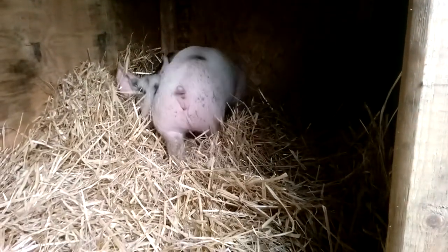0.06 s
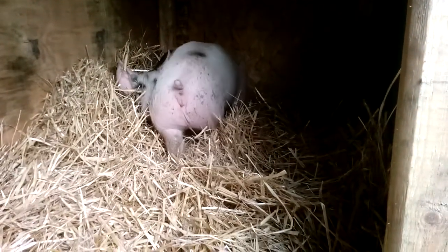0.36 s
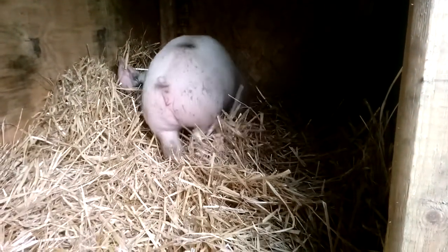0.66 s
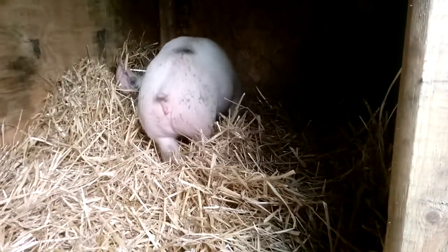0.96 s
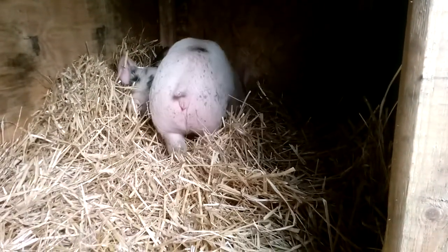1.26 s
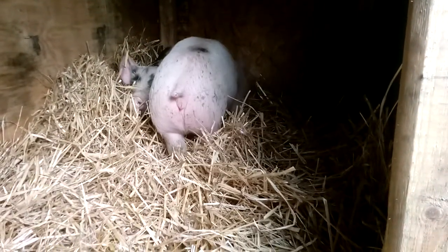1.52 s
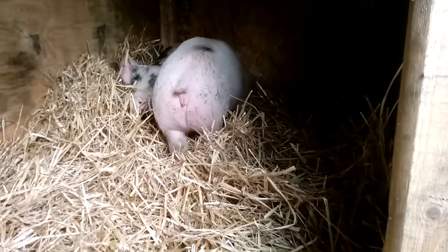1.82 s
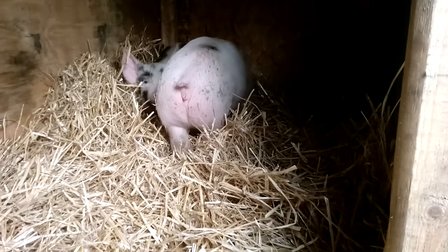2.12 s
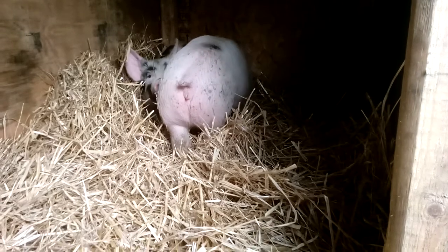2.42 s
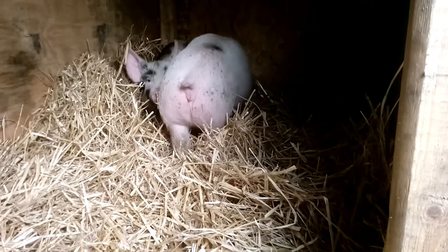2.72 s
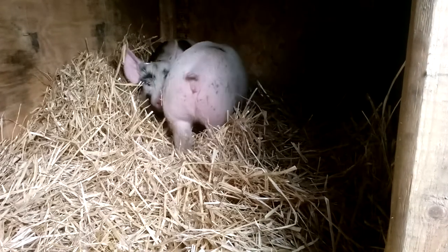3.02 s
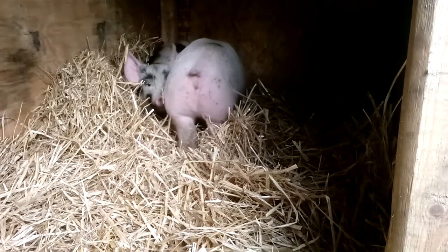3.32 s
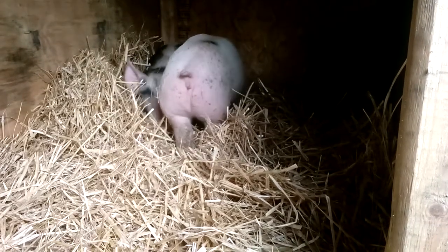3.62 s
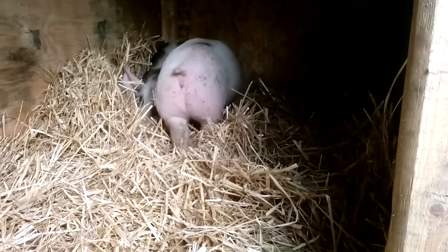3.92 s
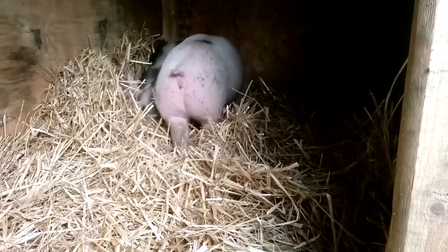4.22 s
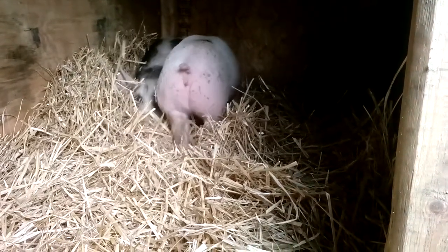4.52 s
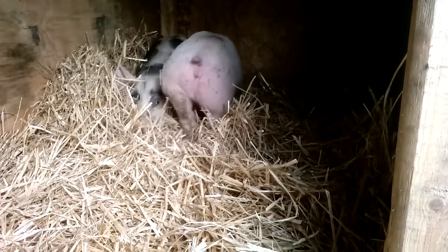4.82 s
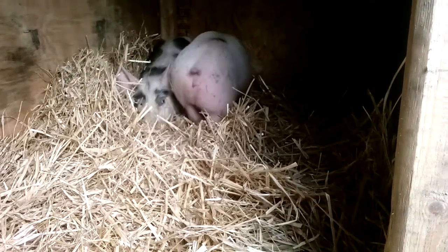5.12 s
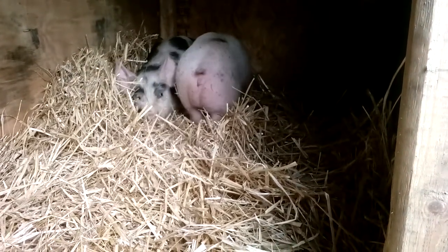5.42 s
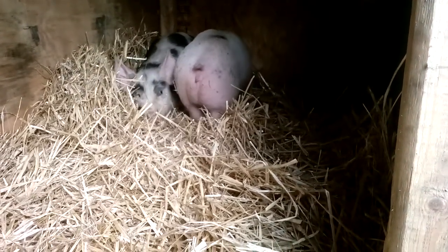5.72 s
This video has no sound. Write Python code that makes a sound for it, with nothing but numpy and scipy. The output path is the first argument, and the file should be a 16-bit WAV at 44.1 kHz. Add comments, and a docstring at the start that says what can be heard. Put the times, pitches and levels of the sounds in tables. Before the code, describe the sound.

Dry hay crackles and rustles as piglets root through it, with one short low grunt and a dull bump against wood.

```python
"""Piglets rooting in hay

Piglets push through deep dry hay in a small wooden shed. Thousands of stalks crackle as they
break and slip, single straws snap, and feet press the bedding down. One pig gives a short low
grunt. Later a body bumps the boards and a low rumble trails off. Faint hiss and a drone lie beneath."""
import sys
import numpy as np
from scipy import signal
from scipy.fft import rfft, irfft, next_fast_len
from scipy.io import wavfile
from scipy.ndimage import uniform_filter1d

SR = 44100
rng = np.random.default_rng(int(sys.argv[2]) if len(sys.argv) > 2 else 0)


def output_pcm(signal):
    """Save a mono or channel-first signal as 16-bit PCM at the path in sys.argv[1].

    Samples are clipped to [-1, 1] before scaling.
    """
    pcm = np.clip(np.atleast_2d(signal).T, -1, 1) * 32767
    wavfile.write(sys.argv[1], SR, np.round(pcm).astype(np.int16))


N = 262819
TIME = np.arange(N) / SR


def from_db(db):
    """Turns decibels into a number to multiply a sound by."""
    return 10 ** (np.asarray(db) / 20)


def unit(x):
    """Scales a signal to an average strength (rms) of 1."""
    return x / np.sqrt(np.mean(x ** 2) + 1e-20)


def wander(samples):
    """A random drift, smoothed over this many samples."""
    return unit(uniform_filter1d(rng.standard_normal(N), samples))


def swell(middle_s, length_s):
    """A soft rise and fall around one moment."""
    return np.exp(-np.minimum(abs(2 * (TIME - middle_s) / length_s), 10) ** 2)


def coloured(x, colour):
    """Gives a sound a colour: how strong each frequency is, fading beyond the ends of the table."""
    size = next_fast_len(len(x))
    hz, db = np.transpose(colour)
    octave = np.log2(np.fft.rfftfreq(size, 1 / SR) + 1)
    octaves_outside = np.maximum(np.log2(hz[0]) - octave, 0) + np.maximum(octave - np.log2(hz[-1]), 0)
    gain = from_db(np.interp(octave, np.log2(hz), db) - 20 * octaves_outside)
    return unit(irfft(rfft(x, size) * gain, size)[:len(x)])


def resonate(x, hz, width_hz):
    """Keeps the part of a sound that lies near one frequency."""
    b, a = signal.iirpeak(hz, hz / width_hz, fs=SR)
    return unit(signal.lfilter(b, a, signal.lfilter(b, a, x)))


def fractures(per_s, spread_db):
    """Tiny breaks and slips: clicks of uneven size at random moments."""
    size = from_db(spread_db * np.minimum(rng.exponential(1, N), 4))
    return size * rng.choice([-1, 1], N) * (rng.random(N) < per_s / SR)


def throb(hz, rough, tone_colour, puff_colour, jitter):
    """Uneven pulses, each with a puff of noise; the rougher the sound, the more the puffs take over."""
    rough = np.clip(rough, 0, 1)
    cycles = np.cumsum(hz * (1 + jitter * wander(300))) / SR
    # Echoes scramble the timing of the overtones.
    pulses = sum(np.cos(2 * np.pi * (k * cycles + rng.random())) for k in range(1, 12))
    puffs = np.exp(-(cycles % 1)) * rng.standard_normal(N)
    return np.sqrt(1 - rough ** 2) * coloured(pulses, tone_colour) + rough * coloured(puffs, puff_colour)


# The colours of the background. Each row: frequency in Hz, relative level in dB.
AIR_COLOUR = [(20, 3), (130, 4.5), (260, 0), (700, 1), (1600, -2), (3600, -3), (4600, 1.5), (5400, 0.5),
              (6500, -12.5), (8000, -11), (11000, -7), (15500, -8.8)]
DRONE_COLOUR = [(20, -21), (42, -18), (62, -5), (88, 2), (105, -1), (135, -18), (250, -29)]

def background():
    """Still air and microphone hiss, a faint drone from outside and a thin high hiss, all steady."""
    air = from_db(-68) * coloured(rng.standard_normal(N), AIR_COLOUR)
    drone = from_db(-73) * coloured(rng.standard_normal(N), DRONE_COLOUR)
    thin_hiss = from_db(-72.5) * resonate(rng.standard_normal(N), hz=4540, width_hz=260)
    return air + drone + thin_hiss


# A pig shifts its weight. Each row: middle in seconds, level in dB, length in seconds.
STEPS = [(2.83, -64, .06), (2.967, -61, 0.067), (3.663, -60, 0.064), (3.87, -65, 0.19), (4.578, -63, 0.13),
         (4.916, -60.5, 0.15)]

def footfalls():
    """Steps reach the floor through the hay as faint low thuds."""
    weight = sum(from_db(db) * swell(middle, length) for middle, db, length in STEPS)
    return weight * resonate(rng.standard_normal(N), hz=73, width_hz=27)


# The surges of the rumble. Each row: middle in seconds, level in dB, length in seconds.
RUMBLE_SURGES = [(5.286, -46, .03), (5.333, -44.5, 0.059), (5.41, -51.5, 0.045), (5.464, -49.5, 0.046),
                 (5.53, -57, 0.051), (5.588, -62.5, .1)]
# Its deep colour. Each row: frequency in Hz, relative level in dB.
DEEP_COLOUR = [(25, -8), (50, -6), (80, -1.5), (110, -10), (170, -22), (400, -26), (800, -50)]

def rumble(start_s, slowing_s=0.5):
    """A low rumble follows the bump in weakening surges, growing slower and rougher."""
    age = np.clip(TIME - start_s, 0, slowing_s)
    level = sum(from_db(db) * swell(middle, length) for middle, db, length in RUMBLE_SURGES)
    hz = 86 - 31 * age
    rough = 0.3 + 1.4 * age
    return level * throb(hz, rough, DEEP_COLOUR, DEEP_COLOUR, jitter=0.0475)


# The notes of the wall. Each row: pitch in Hz, relative level in dB, seconds to fade by 60 dB.
BOARD_NOTES = [(80, 6, 0.058), (58, -17, .07), (118, -15, .06)]

def bump(start_s, peak_db=-29, contact_s=0.017):
    """A soft body knocks the wall, and the boards ring briefly."""
    age = np.maximum(TIME - start_s, 0)
    ring = sum(from_db(db - 60 * age / fade_s) * np.sin(2 * np.pi * hz * age)
               for hz, db, fade_s in BOARD_NOTES)
    knock = ring * (1 - np.exp(-(age / contact_s) ** 2))
    return from_db(peak_db) * knock / abs(knock).max()


# How the grunt moves. Each row: time in seconds, level in dB, pitch in Hz, roughness from 0 to 1.
GRUNT_PATH = [(.468, -70, 105.2, 1), (.481, -53, 102.8, 1), (.489, -42, 103, 1), (.497, -34, 100.2, 0.2),
              (.526, -32, 96.5, 0.08), (.548, -40.5, 89.7, 0.18), (.57, -45, 92.4, 0.2), (.6, -64, 88, 0.2)]
# The colours of its tone and its rasp. Each row: frequency in Hz, relative level in dB.
THROAT_COLOUR = [(60, -4), (95, 2), (130, -11), (195, -18), (300, -26), (400, -31), (500, -27), (600, -40),
                 (700, -21.5), (1000, -52)]
RASP_COLOUR = [(55, -6), (110, 7.5), (190, -3), (320, -2), (490, -5), (720, -18), (1200, -19)]

def grunt():
    """A short grunt through a closed mouth starts with a rasp and sinks in pitch."""
    times, *columns = np.transpose(GRUNT_PATH)
    level_db, hz, rough = [np.interp(TIME, times, column) for column in columns]
    sounding = (TIME > times[0]) & (TIME < times[-1])
    return sounding * from_db(level_db) * throb(hz, rough, THROAT_COLOUR, RASP_COLOUR, jitter=0.024)


# Presses on the bedding. Each row: middle in seconds, level in dB, length in seconds, rough pitch in Hz.
PRESSES = [(0.926, -58.5, 0.12, 247), (2.072, -66, .21, 284), (2.119, -56.5, 0.16, 895),
           (2.636, -53.5, 0.081, 675), (3.088, -61.5, .13, 280), (3.452, -63.5, 0.034, 384),
           (3.514, -62, 0.046, 450), (3.563, -59.5, 0.13, 945), (3.703, -56, 0.08, 570),
           (3.99, -67, 0.1, 560), (4.222, -66, 0.034, 640), (4.49, -62.5, 0.14, 524),
           (4.69, -62.5, 0.22, 423), (4.922, -57.5, 0.073, 318), (4.984, -55, 0.048, 350),
           (5.104, -61.5, 0.066, 445), (5.3, -50, 0.086, 820), (5.314, -58, 0.052, 407),
           (5.366, -52, 0.05, 744), (5.451, -54, 0.057, 716)]

def presses():
    """Feet and snouts squeeze the bedding, each time in a soft swell with its own dull note."""
    clicks = fractures(per_s=2500, spread_db=0.2)
    return sum(from_db(db) * swell(middle, length) * resonate(clicks, hz, width_hz=0.73 * hz)
               for middle, db, length, hz in PRESSES)


# Breaking straws. Each row: start in seconds, level in dB, fade time in seconds, dullness from 0 to 1.
STRAW_SNAPS = [(1, -44, .007, 0.9), (2.498, -54, 0.0031, 0.04), (2.771, -40.5, 0.0077, 0.06),
               (2.999, -39, 0.0091, 0.6), (3.039, -51, 0.0076, 0.3), (3.133, -44.5, 0.0093, .8),
               (3.143, -44.5, 0.01, 0.56), (3.235, -44.5, 0.014, .7), (3.338, -48, .005, 0.8),
               (3.375, -41, 0.0058, 0.7), (3.47, -62, 0.0065, 0), (3.577, -39, 0.0025, 0),
               (4.185, -56, 0.0036, .1), (4.68, -39, 0.012, 0.8), (5.458, -48.5, 0.012, 1)]

def snaps(rise_share=0.11):
    """A straw splinters in a quick run of clicks; a thick tuft gives way slower and duller."""
    splinters = fractures(per_s=20000, spread_db=-1.2)
    # Snaps share the colours of the hay, listed further down.
    straw = coloured(splinters, CRACKLE_COLOUR) + from_db(-23) * coloured(splinters, FIZZ_COLOUR)
    tuft = coloured(rng.standard_normal(N), CRUNCH_COLOUR)
    out = np.zeros(N)
    for start, db, fade_s, dull in STRAW_SNAPS:
        span = (TIME > start) & (TIME < start + 10 * fade_s)
        progress = (TIME[span] - start) / fade_s
        burst = (1 - np.exp(-progress / rise_share)) * np.exp(-progress)
        blend = np.sqrt(1 - dull) * straw[span] + np.sqrt(dull) * tuft[span]
        out[span] += from_db(db) * burst / burst.max() * blend
    return out


# Pushes through the hay. Each row: start, rise, hold and time to fade by 60 dB, all in seconds,
# level in dB, depth of digging (0 is usual, more is deeper), extra fizz from sliding on top in dB.
HAY_PUSHES = [(-.01, 0.019, 0.031, 1.2, -45, -0.5, 2.5), (.137, .047, .014, 0.57, -49, -1.8, 5),
              (0.247, 0.065, .021, 0.75, -52, 1, 2.7), (0.41, 0.11, .13, 0.95, -49, -0.7, -.7),
              (0.51, 0.31, .2, 0.99, -44, 0, 1.6), (1.015, 0.08, 0.055, .5, -47, -2, 1.5),
              (1.117, 0.059, 0.097, 0.43, -43, -2, 1), (1.313, 0.058, 0.072, 1.2, -56.5, -2, 1),
              (1.923, .13, 0.12, 0.48, -52.5, -2.5, 1.5), (2.251, 0.061, .005, 0.29, -59, -1.4, -8),
              (2.345, 0.035, 0.0085, 0.6, -56.5, -1.5, -6), (2.53, 0.13, 0.055, 0.24, -52, 1, -1.5),
              (2.71, 0.068, .015, 1.7, -48, -0.9, 2.3), (2.872, 0.12, 0.081, 0.53, -49.5, 1, 2.6),
              (3.083, 0.056, 0.13, 1, -50.5, 1, 0), (3.285, .07, .06, .7, -57.5, 4, -6),
              (3.436, 0.061, 0.18, 0.69, -59.5, -2.5, -1), (3.616, 0.082, 0.17, 1.26, -50.5, -0.1, 1),
              (4.02, 0.36, 0.2, .4, -50.5, -1.8, -2.5), (4.53, 0.12, 0.047, 0.83, -45.5, .5, 0.5),
              (4.679, 0.096, 0.039, 0.61, -45, 0.7, 3.5), (4.833, .032, .13, 0.84, -50, 0.2, 0.7),
              (5.077, .13, 0.11, .38, -48.5, -0.3, -1.5), (5.313, 0.11, 0.087, 0.46, -54.5, 1.8, -4.5),
              (5.598, .1, 0.096, .8, -67.5, 2, -4), (5.817, 0.15, .05, 0.43, -56, 1.1, -1.5)]
ORDINARY_PUSH_DB = -50

def pushing(growth=1, db_per_depth=0, sliding=False):
    """How strong one hay sound is over time: each push builds, holds and lets the stalks settle."""
    coarse_time = TIME[::32]
    power = 0
    for start, rise, hold, fade_s, db, depth, slide_db in HAY_PUSHES:
        age = coarse_time - start
        build = np.sin(np.pi / 2 * np.clip(age / rise, 0, 1))
        settling_db = 60 * np.maximum(age - rise - hold, 0) / fade_s
        effort = build * from_db(db - ORDINARY_PUSH_DB - settling_db)
        extra_db = db_per_depth * depth + (slide_db if sliding else 0)
        power += (effort ** growth * from_db(extra_db)) ** 2
    return np.interp(TIME, coarse_time, np.sqrt(power))


def shifting(x, depth_db):
    """As the pigs move, other stalks and paths to the walls take over, so frequencies come and go."""
    spectrum = signal.stft(x, nperseg=1024, noverlap=768)[2]
    patches = uniform_filter1d(rng.standard_normal(spectrum.shape), 5, axis=0)  # smooth across frequency
    patches = unit(uniform_filter1d(patches, 22, axis=1))  # and across time
    return signal.istft(spectrum * from_db(depth_db * patches), nperseg=1024, noverlap=768)[1][:N]


def rustle(colour, per_s, spread_db, clump_db, shift_db):
    """Tiny breaks come in clumps as tufts give way, and ring in the stalks."""
    clumps = from_db(clump_db * wander(700))
    clicks = fractures(per_s, spread_db) * clumps
    return coloured(shifting(clicks, shift_db), colour)


# The colours of the four hay sounds. Each row: frequency in Hz, relative level in dB.
CRACKLE_COLOUR = [(2400, -12), (3400, -7.5), (4200, 0), (4700, 1), (5200, -1.5), (5700, -6), (6500, -18),
                  (8000, -54)]
CRUNCH_COLOUR = [(600, -17), (1000, -4), (1350, 0.5), (2000, 1), (3000, -0.5), (3700, -1), (5200, -29)]
FIZZ_COLOUR = [(4800, -12), (6200, -1.5), (7200, 0), (9300, -3), (10400, -9), (11800, -21), (15500, -36)]
ROOTING_COLOUR = [(150, -33), (300, -13), (480, -6.5), (700, -1), (930, 1), (1200, -11.5), (2000, -27)]

def hay():
    """With each push, dry stalks crackle, the bulk crunches, the top fizzes and the depths rustle."""
    crackle = rustle(CRACKLE_COLOUR, per_s=9000, spread_db=2.5, clump_db=0.63, shift_db=1.18)
    crunch = rustle(CRUNCH_COLOUR, per_s=7000, spread_db=1.5, clump_db=0.57, shift_db=2.0)
    fizz = rustle(FIZZ_COLOUR, per_s=7000, spread_db=0.5, clump_db=0.4, shift_db=3.0)
    rooting = rustle(ROOTING_COLOUR, per_s=3500, spread_db=2.5, clump_db=1.57, shift_db=3.0)
    # A growth above 1 favours hard pushes, so a light touch mostly crackles.
    crackle *= from_db(ORDINARY_PUSH_DB + 0.05) * pushing()
    crunch *= from_db(-52.5) * pushing(growth=1.22, db_per_depth=0.72)
    fizz *= from_db(-64) * pushing(growth=1.21, sliding=True)
    rooting *= from_db(-59.5) * pushing(growth=1.2, db_per_depth=2.2)
    return crackle + crunch + fizz + rooting


def shed(x, echo_db=-11, fade_s=0.051, echoes_per_s=2000):
    """Nearby boards send back thin echoes, and the hay soaks them up quickly."""
    age = TIME[:SR // 4]
    bounces = rng.standard_normal(len(age)) * (rng.random(len(age)) < echoes_per_s / SR)
    tail = bounces * (age > 0.003) * from_db(-60 * age / fade_s)
    echoes = signal.fftconvolve(x, tail / np.linalg.norm(tail))[:N]
    echo_gain = from_db(echo_db)
    return (x + echo_gain * echoes) / np.hypot(1, echo_gain)


def scene():
    """Adds all the sounds together, the same in both ears."""
    bump_s = 5.236
    bedding = shed(hay() + presses() + snaps())
    mono = bedding + footfalls() + grunt() + bump(bump_s) + rumble(bump_s) + background()
    return np.array([mono, mono])


def record(dry):
    """Cuts away the very highest treble."""
    cutoff_hz = 15850
    low_pass = signal.firwin(511, cutoff_hz, window=("kaiser", 9), fs=SR)
    return signal.oaconvolve(dry, low_pass[None], "same")


dry = scene()
out = record(dry)
output_pcm(out)
```